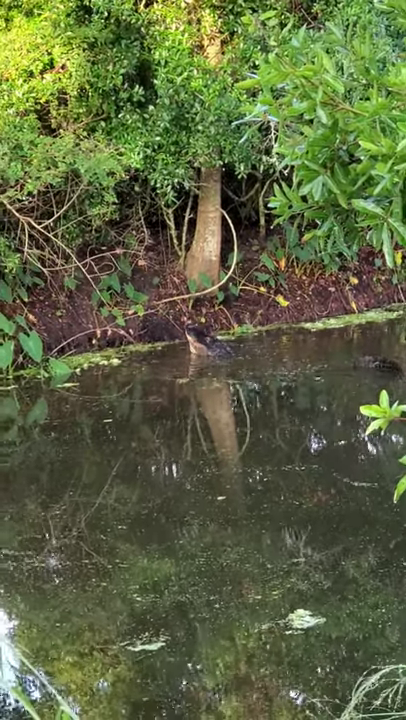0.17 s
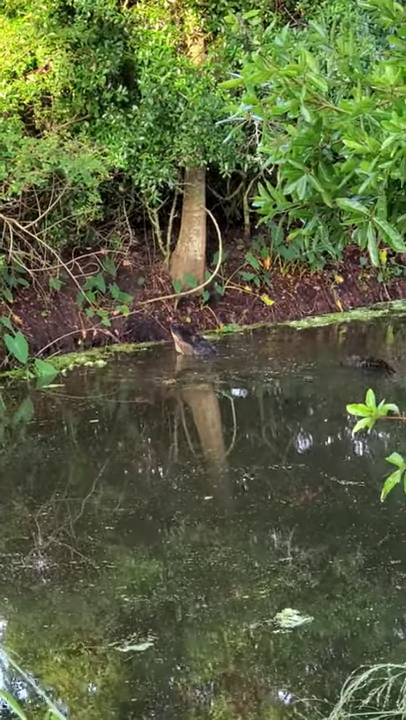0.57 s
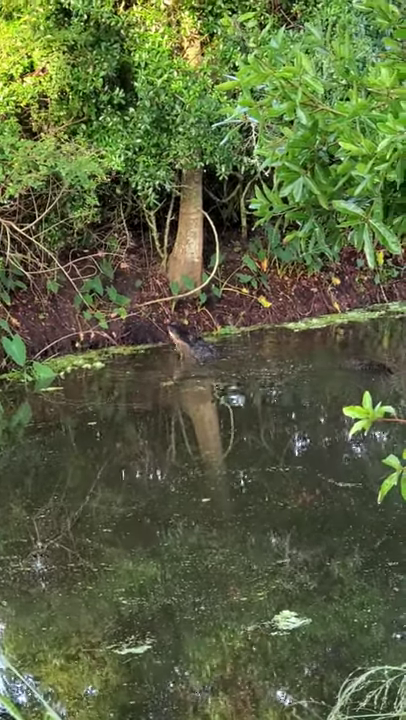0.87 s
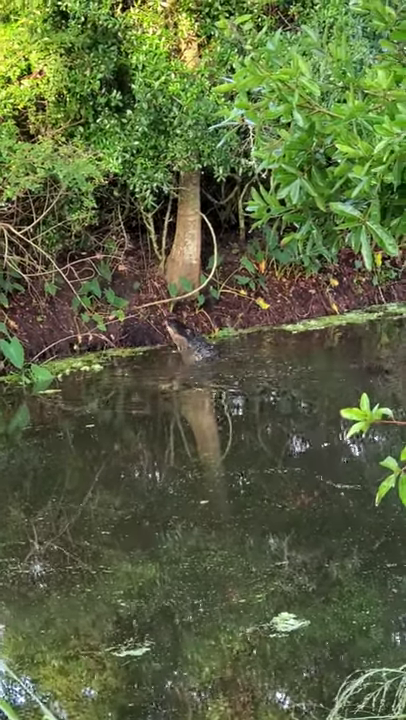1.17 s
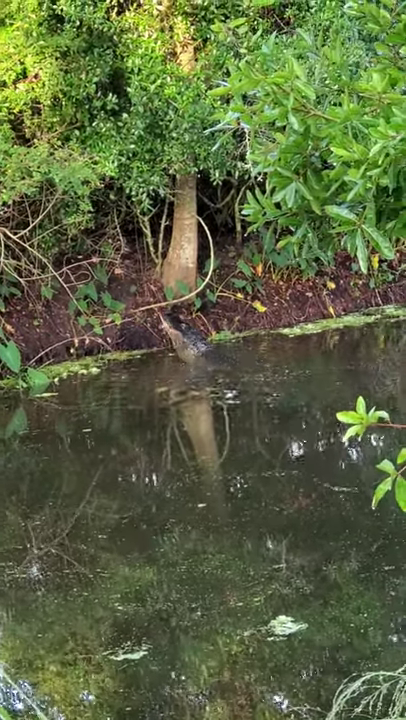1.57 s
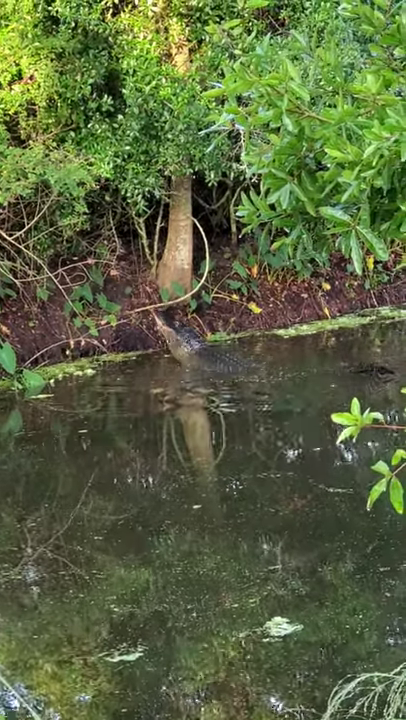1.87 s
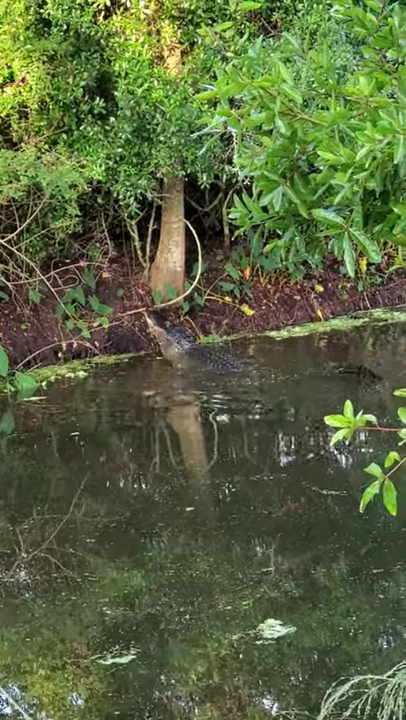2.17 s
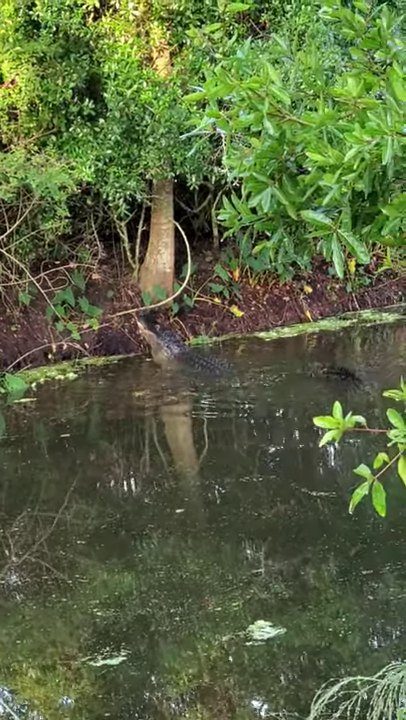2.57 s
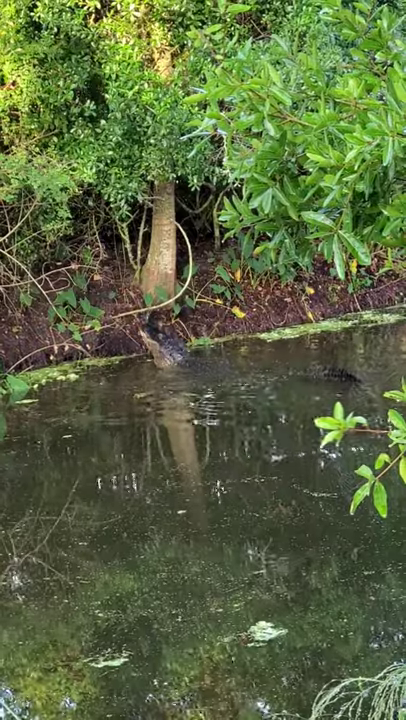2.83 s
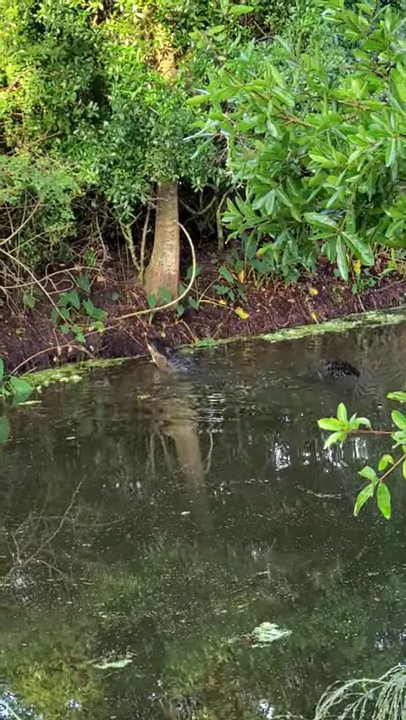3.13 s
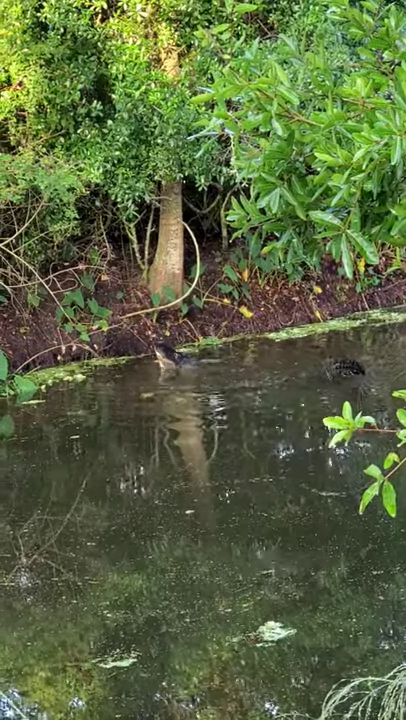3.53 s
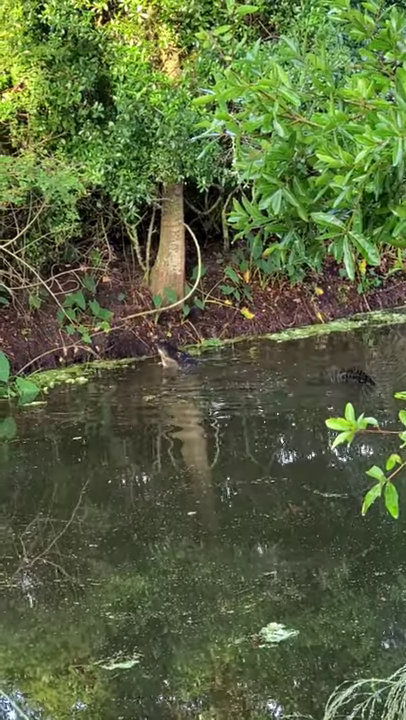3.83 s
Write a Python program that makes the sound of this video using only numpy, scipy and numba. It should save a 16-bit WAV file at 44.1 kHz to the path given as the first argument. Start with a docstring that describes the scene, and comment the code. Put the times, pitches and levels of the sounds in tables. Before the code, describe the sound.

Deep alligator bellows with a pause between, water spattering, and faint crickets and frogs.

```python
"""Alligator in a still swamp

An alligator ends one bellow, pauses, then leads softly into the next. Slow pulses ring its throat
and mouth, each with a weaker second flap, and its shaking back sprays water. Crickets trill,
frogs rasp, a katydid ticks and a far bird whistles over a low rumble."""
import sys
import numpy as np
from scipy import signal
from scipy.fft import rfft, irfft
from scipy.io import wavfile
from scipy.ndimage import uniform_filter1d
from numba import njit

SR = 44100
rng = np.random.default_rng(int(sys.argv[2]) if len(sys.argv) > 2 else 0)


def dump(signal):
    """Clip the signal to [-1, 1] and save it as 16-bit WAV at the path in sys.argv[1]."""
    limited = np.clip(np.atleast_2d(signal).T, -1, 1)
    pcm = np.round(limited * 32767).astype(np.int16)
    wavfile.write(sys.argv[1], SR, pcm)


N = 176400


def undb(db):
    return 10 ** (np.asarray(db) / 20)


def unit(x):
    return x / np.sqrt(np.mean(x ** 2) + 1e-18)


def noise():
    return rng.standard_normal(N)


@njit
def moving_band(x, hz, width):
    """Keep the sound near a pitch that may move (a band-pass filter)."""
    y, b, l = np.empty(len(x)), 0., 0.
    for i in range(len(x)):
        g, k = np.tan(np.pi * hz[i] / SR), width[i] / hz[i]
        v = (b + g * (x[i] - l)) / (1 + g * (g + k))
        b, l, y[i] = 2 * v - b, l + 2 * g * v, k * v
    return y


def band(x, hz, *widths_hz):
    """Filter around hz, once for each width given."""
    for width in widths_hz:
        x = moving_band(x, hz + np.zeros(N), width + np.zeros(N))
    return x


def ring(x, hz, width_hz):
    """Filter forwards, then backwards: each pulse becomes a burst that swells and dies evenly."""
    hz, width = hz + np.zeros(N), width_hz + np.zeros(N)
    forwards = band(x, hz, width, width)
    backwards = band(forwards[::-1], hz[::-1], width[::-1], width[::-1])
    return backwards[::-1] * np.sqrt(SR / width)


def wander(rate_hz):
    """A smooth random wobble, roughly 1 in size."""
    k = int(SR / rate_hz)
    steps = np.repeat(rng.standard_normal(N // k + 1), k)
    return 1.83 * uniform_filter1d(uniform_filter1d(steps, k), k)[:N]


def gate(t, start, length, fade_s):
    return np.clip(np.minimum(t - start, start + length - t) / fade_s, 0, 1)


def pan(x, left_db):
    return x * undb(np.array([[left_db], [-left_db]]) / 2)


def curves(t, table):
    """Join a table's rows with straight lines: one curve for each column after the time."""
    times, *columns = np.array(table, float).T
    return [np.interp(t, times, column) for column in columns]


def level_at(hz, table):
    pitches, levels = np.array(table).T
    return np.interp(np.log(hz), np.log(pitches), levels)


# How strong the background is, from low to high: f/Hz, level/dB
AIR_TONE = [(12, -53), (20, 5.5), (102, 0), (117, -0.5), (199, -13.5), (407, -20.5), (523, -17.5),
            (860, -22), (1040, -22.5), (1970, -28.5), (2750, -31), (3430, -35.5), (5800, -15), (8080, -25),
            (9020, -52), (10900, -27), (14800, -31)]
AIR_DB, AIR_PAN_DB, WIDE_ABOVE_HZ = -43.5, -1, 870

def air():
    """Far rumble and hiss: the bass sits near the middle, the treble spreads wide."""
    hz = np.maximum(np.arange(N // 2 + 1) * SR / N, 10)
    tone = undb(level_at(hz, AIR_TONE))
    middle = irfft(rfft(noise()) * tone, N)
    side = irfft(rfft(noise()) * tone * hz / np.hypot(hz, WIDE_ABOVE_HZ), N)
    both = unit(np.array([middle + side, middle - side]))
    return pan(both * undb(AIR_DB + 0.17 * wander(3.08)), AIR_PAN_DB)


# The high pitches at which the head rings: f/Hz, width/Hz, level/dB
HEAD_RINGS = [(790, 450, -16.5), (1214, 154, -8), (1842, 163, -5.5), (2420, 86, -13.5), (2735, 170, -13),
              (3263, 140, -13), (3837, 98, -15.5)]

def head(rasp):
    """The bellow's rasp rings in the head; each ring wavers in pitch and level."""
    out = 0
    for centre_hz, width, db in HEAD_RINGS:
        hz = centre_hz * (1 + .012 * wander(9))
        out += undb(db + 3 * wander(18)) * band(rasp, hz, width, width) * np.sqrt(SR / width)
    return out


# The alligator's three calls:
# t/s, pulse rate/Hz, throat level/dB, throat f/Hz, mouth f/Hz, mouth/dB, chest/dB, head/dB
ENDING_BELLOW = [(0,31.05,-19.5,240.3,519,-36,-25.5,-46), (0.27,31.93,-21,260,477,-32.5,-27,-44),
                 (0.453,31.11,-19.5,235.6,499,-36,-28.5,-42.5), (0.589,28.52,-21,220.4,471,-33.5,-30,-50.5),
                 (.7,26.38,-23.5,213,498,-42.5,-35,-47), (0.771,23.66,-26,201,483,-43.5,-37,-60),
                 (0.811,22.68,-37,192,476,-54,-64,-40), (.83,22,-65,190,500,-52,-50,-62)]
SOFT_LEAD_IN = [(2.8,65.3,-60,168,396,-62,-49,-82), (2.85,61.1,-44,175,377,-59.5,-37.5,-76),
                (2.93,61,-41,164,380,-67,-42.5,-83), (3.03,59.9,-46,172,459,-61,-34,-76)]
NEXT_BELLOW = [(3.048,53.17,-16.5,189.2,480,-36.5,-23,-44), (3.111,54.05,-25,192.5,450,-36,-20,-34.5),
               (3.135,54.4,-11.5,170,543,-32,-13,-38), (3.17,55.23,-21.5,173,509,-28,-22,-35),
               (3.2,54.4,-18,160,508,-35.5,-22,-32.5), (3.231,53.5,-16,165,517,-33,-19,-37.5),
               (3.26,52.24,-20,175,482,-29,-21,-35), (3.286,51.45,-15.5,192,510,-27,-14,-33.5),
               (3.315,50.45,-25,184,494,-29.5,-19.5,-37.5), (3.346,49.5,-15.5,180.6,470,-30.5,-25,-35),
               (3.401,48.1,-27,180,460,-29.5,-24.5,-36.5), (3.44,46.77,-26,180,477,-30,-20.5,-35),
               (3.466,45.7,-21.5,172,494,-35,-22,-37), (3.509,44.23,-30,189.3,493,-31,-26,-37.5),
               (3.57,42.58,-17,176,464,-28,-29,-37.5), (3.621,40.12,-17.5,183,485,-30,-27,-36),
               (3.679,37.61,-22,199,475,-33,-22.5,-36.5), (3.758,34.8,-15,203,483,-33,-29,-38.5),
               (3.881,31.46,-20.5,223,513,-35.5,-24,-39), (4,29.96,-16.5,218,515,-34,-26,-42)]
# How strained the voice is: t/s, roughness (0 to 1), throb depth/dB
VOICE_STRAIN = [(.8, .09, 0), (2.8, .35, 0), (3.05, .4, 0), (3.15, .28, 0), (3.28, .3, 1.5),
                (3.5, .38, 1.5), (3.65, .3, 1), (3.8, .12, 0)]
# How the throat rings: t/s, width/Hz, second flap/dB, lingering ring/dB, low ring/dB
THROAT_SHAPE = [(0, 144, -3, -8.5, -7), (.5, 141, -5, -7, -7.5), (.62, 160.2, -11.5, -21, -17),
                (.8, 162, -10, -12, -18), (2.8, 168.7, -13, -13.5, -10), (3.07, 168, -12.5, 0.5, -6),
                (3.14, 138, -18.5, 3.5, -10.5), (3.24, 134, -10.5, -4, -9.5), (3.3, 159, -9.5, 3.5, -9.5),
                (3.6, 180, -11.5, -9, -6), (3.8, 157, -6, -7.5, 0), (4, 151, -8.5, -15.5, -7)]
PULSE_ALIGN_S = (.0305, 3.7, 3.301)  # each call's pulses are lined up on one of these times
THROB_HZ, THROB_PEAK_S = 17.4, 3.28  # the body shakes and squeezes the throat
JITTER, SHIMMER_DB, BREATH = .05, 4, 1.2  # uneven timing, uneven level, air: all times roughness
SECOND_FLAP_S, MOUTH_LAG_S, FADE_S = .0223, .002, .01
LOW_RING_HZ, LOW_WIDTH_HZ, LINGER_WIDTH_HZ, MOUTH_WIDTH_HZ = 149, 146, 31.7, 147

def bellow(t, call, align_s):
    """A strong and a weak flap each cycle ring throat and mouth; air rasps and the chest hums."""
    rate_hz, throat_db, throat_hz, mouth_hz, mouth_db, chest_db, head_db = curves(t, call)
    rough, throb_db = curves(t, VOICE_STRAIN)
    width_hz, second_db, linger_db, low_db = curves(t, THROAT_SHAPE)
    on = gate(t, call[0][0] - FADE_S, call[-1][0] - call[0][0] + 2 * FADE_S, FADE_S)
    push = on * undb(throb_db * np.cos(2 * np.pi * THROB_HZ * (t - THROB_PEAK_S)))

    cycles = np.cumsum(rate_hz) / SR
    cycles -= cycles[int(align_s * SR)]
    uneven = cycles + JITTER * rough * wander(40)
    strength = undb(SHIMMER_DB * rough * wander(50)) * np.sqrt(SR / rate_hz)
    # One click each time the cycle count passes a whole number.
    pulses, late_pulses = (strength * (np.diff(np.floor(uneven - lag * rate_hz), prepend=np.inf) > 0)
                           for lag in (0, SECOND_FLAP_S))
    first_flap = push * (pulses + BREATH * rough * noise())
    both_flaps = first_flap + push * undb(second_db) * late_pulses
    puff = np.exp(-(cycles % 1) / 1.54)
    rasp = push * (0.33 * pulses + (0.38 + puff) * noise())

    throat = ring(both_flaps, throat_hz, width_hz)
    throat += undb(linger_db) * band(throat, throat_hz, LINGER_WIDTH_HZ)
    throat -= undb(low_db) * ring(first_flap, LOW_RING_HZ, LOW_WIDTH_HZ)
    mouth = ring(both_flaps + .25 * rasp, mouth_hz, MOUTH_WIDTH_HZ)
    mouth = np.interp(t - MOUTH_LAG_S, t, mouth)
    chest = on * (np.cos(2 * np.pi * cycles) + undb(-3) * np.cos(4 * np.pi * cycles))
    return (undb(throat_db) * throat + undb(mouth_db) * mouth
            + undb(head_db - 8.5) * head(rasp) + undb(chest_db) * chest)


def beat(t, rate_hz):
    """Rounded pulses with equally long rests between them."""
    return np.clip(np.sin(2 * np.pi * rate_hz * t), 0, 1)


CHORUS_HZ, CHORUS_RATE_HZ, CHORUS_DB = 6050, 48.4, -66

def cricket_chorus(t):
    """Many far crickets blur into a narrow, fluttering hiss."""
    flutter = 1 + .5 * beat(t, CHORUS_RATE_HZ)
    both = np.array([unit(flutter * band(noise(), CHORUS_HZ, 100, 200)) for _ in range(2)])
    return pan(both * undb(CHORUS_DB + 0.85 * wander(0.53)), AIR_PAN_DB)


# One cricket's trills: t/s, length/s, level/dB
CRICKET_TRILLS = [(0.43, 0.53, -56.5), (1.232, 0.55, -56), (2.183, 0.812, -54.5), (3.554, .45, -54.5)]
TRILL_HZ, TRILL_SWING_HZ, TRILL_RATE_HZ = 5500, 159, 40.6

def cricket(t):
    """A cricket on the right trills in quick chirps, each falling in pitch."""
    hz = TRILL_HZ + TRILL_SWING_HZ * np.cos(2 * np.pi * TRILL_RATE_HZ * t)
    tone = np.sin(2 * np.pi * np.cumsum(hz) / SR)
    blur = .22 * unit(band(noise(), TRILL_HZ, 86))
    chirps = unit(beat(t, TRILL_RATE_HZ) * (tone + blur))
    level = sum(undb(db) * gate(t, start, length, 0.019) for start, length, db in CRICKET_TRILLS)
    return pan(chirps * undb(1.8 * wander(15)) * level, left_db=-6)


# Frog croaks: t/s, length/s, level/dB, first f/Hz, last f/Hz
CROAKS = [(0.593, 0.2, -45, 1494, 1604), (1.25, 0.16, -54.5, 1570, 1490), (1.397, 0.53, -55.5, 1577, 1646),
          (2.017, 0.3, -56.5, 1696, 1455), (2.255, 0.13, -57, 2790, 2850), (2.5, 0.224, -53.5, 1590, 1500),
          (2.805, 0.41, -50, 1463, 1616)]
RASP_RATE_HZ, CROAK_WIDTH_HZ = 120, 110

def frogs(t):
    """Each croak is a fluttering rasp that rings at two close, gliding pitches."""
    out = 0
    for start, length, db, first_hz, last_hz in CROAKS:
        hz = np.interp(t, [start, start + length], [first_hz, last_hz])
        rasp = (0.61 + np.cos(np.pi * RASP_RATE_HZ * t) ** 2) * noise()
        lower = unit(band(rasp, hz, CROAK_WIDTH_HZ, 360))
        upper = unit(band(rasp, 1.16 * hz, CROAK_WIDTH_HZ, 340))
        out += undb(db) * gate(t, start, length, 0.028) * (lower + undb(-4) * upper)
    return out


# The ticks of a katydid, a cousin of the cricket: t/s, level/dB
KATYDID_TICKS = [(0.695, -28), (1.3793, -26.5), (1.919, -27.5), (2.461, -23), (2.9577, -28.5),
                 (3.6729, -25)]
TICK_HZ, TOOTH_GAP_S, ECHO_S, ECHO_DB = 13200, 0.0016, 0.041, -18.5

def katydid(t):
    """Each tick is a scrape over seven tiny teeth, with a short echo."""
    scrapes = np.zeros(N)
    for when, db in KATYDID_TICKS:
        for tooth, tooth_db in enumerate((-17, -8, -2, -1, -1, -8, -12)):
            scrapes[int((when + (tooth - 2) * TOOTH_GAP_S) * SR)] += 6 * undb(db + tooth_db)
        scrapes += undb(db + ECHO_DB) * gate(t, when, ECHO_S, .008) * noise()
    return pan(band(scrapes, TICK_HZ, 2000, 4000), left_db=-15)


# Single drips: t/s, level/dB, f/Hz, time to fade by 60 dB/s
WATER_DRIPS = [(.838, -31.5, 567, 0.12), (2.245, -36.5, 625, 0.036), (3.276, -37, 1800, .06),
               (3.313, -26.5, 1780, 0.087), (3.318, -33, 3265, 0.06), (3.335, -31, 2410, 0.056),
               (3.5, -37.5, 3250, 0.21), (3.758, -31.5, 2560, 0.063), (1.1, -49, 580, 0.035),
               (1.6, -46, 1310, 0.037)]

def drips(t):
    """Each drip rings with a clear note that rises a little as it fades."""
    out = 0
    for start, db, hz, fade_s in WATER_DRIPS:
        age = np.clip(t - start, 0, 1)
        note = np.sin(2 * np.pi * hz * age * (1 + 0.32 * age))
        out += undb(db - 60 * age / fade_s) * note * np.clip(age / 0.0086, 0, 1)
    return out


# Bird whistles: t/s, level/dB, first f/Hz, last f/Hz, slide/s, hold/s
BIRD_WHISTLES = [(0.982, -66, 3200, 2520, 0.12, 0.012), (1.222, -59.5, 2285, 2890, 0.15, 0.127),
                 (1.813, -54, 1747, 2805, 0.155, 0.13)]

def bird(t):
    """A far bird's thin, wavering whistles slide to a pitch and hold it."""
    out = 0
    for start, db, first_hz, last_hz, slide, hold in BIRD_WHISTLES:
        level = undb(db + 2.5 * wander(29.9)) * gate(t, start, slide + hold, 0.008)
        hz = np.interp(t, [start, start + slide], [first_hz, last_hz]) + 25 * wander(60)
        out += level * np.sin(2 * np.pi * np.cumsum(hz) / SR)
    return out


# How strong the spray is, from low to high: f/Hz, level/dB
SPRAY_COLOUR = [(2060, -28), (3500, -8), (5150, 4), (5960, 6), (9100, -14), (12100, 1.5), (14000, -10),
                (14800, -16)]
# How loudly the water dances, for both spray and bubbles: t/s, level/dB
SPLASH_LEVEL = [(3.03, -50), (3.082, -42), (3.12, -43.5), (3.3, -45.5), (3.39, -43.5), (3.439, -46),
                (3.51, -40), (3.56, -44), (3.596, -47.5), (3.65, -42.5), (3.85, -50.5), (4.0, -54)]
DROPS_PER_BAND_PER_S, DROP_SCATTER_DB = 900, 2.5

def spray(t):
    """The shaking back throws up a dense patter of small drops."""
    out = 0
    for hz in 3000 * 2 ** np.arange(0, 2.3, .33):
        lands = rng.random((2, N)) < DROPS_PER_BAND_PER_S / SR
        drops = lands * undb(DROP_SCATTER_DB * rng.exponential(size=(2, N)))
        patter = np.array([band(unit(side) + noise(), hz, hz / 4) for side in drops])
        out += undb(level_at(hz, SPRAY_COLOUR) + 1.14 * wander(15)) * patter
    return unit(out) * undb(curves(t, SPLASH_LEVEL)[0]) * gate(t, SPLASH_LEVEL[0][0], 2, 0.033)


BUBBLE_COUNT, BUBBLING_S, BUBBLE_FADE_S = 180, .7, 0.026

def bubbles(t):
    """Bubbles of many sizes ring briefly and glide up while the water dances."""
    out, age = np.zeros(N), t[:SR // 20]
    for when, pitch, strength in rng.random((BUBBLE_COUNT, 3)):
        start, hz = SPLASH_LEVEL[1][0] + when * BUBBLING_S, 700 * 8 ** pitch
        db = curves(start, SPLASH_LEVEL)[0] - 7 + 10 * strength
        note = np.sin(2 * np.pi * hz * age * (1 + 1.6 * age))
        i = int(start * SR)
        out[i:i + len(age)] += undb(db - 60 * age / BUBBLE_FADE_S) * note
    return out


def tree_echo(t, calls, fade_s=.25, db=-16):
    """Trees scatter the calls into a short wash with little bass, different in each ear."""
    age = t[:SR // 3]
    thinned = calls - uniform_filter1d(calls, size=100)
    tails = [rng.standard_normal(len(age)) * undb(-60 * age / fade_s) for _ in range(2)]
    echoes = [signal.fftconvolve(thinned, tail / np.linalg.norm(tail))[:N] for tail in tails]
    return undb(db) * np.array(echoes)


def scene():
    """Alligator, frogs and bird call from slightly right, among water, insects and air."""
    t = np.arange(N) / SR
    parts = zip((ENDING_BELLOW, SOFT_LEAD_IN, NEXT_BELLOW), PULSE_ALIGN_S)
    calls = sum(bellow(t, call, align_s) for call, align_s in parts) + frogs(t) + bird(t)
    left = np.interp(t - 4 / SR, t, calls)  # reaches the left ear 4 samples late
    voices = pan(np.array([left, calls]), left_db=-1.17) + tree_echo(t, calls)
    water = drips(t) + spray(t) + bubbles(t)
    insects = cricket(t) + cricket_chorus(t) + katydid(t)
    return voices + water + insects + air()


BASS_CUT_HZ, TOP_HZ = 45.2, 14850

def record(dry):
    """The microphone loses the lowest bass and cuts off the highest treble steeply."""
    dry = signal.sosfilt(signal.butter(2, BASS_CUT_HZ, "high", fs=SR, output="sos"), dry)
    return signal.sosfilt(signal.ellip(12, .2, 80, TOP_HZ, fs=SR, output="sos"), dry)


dry = scene()
out = record(dry)
dump(out)
```